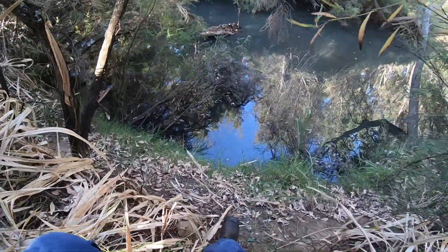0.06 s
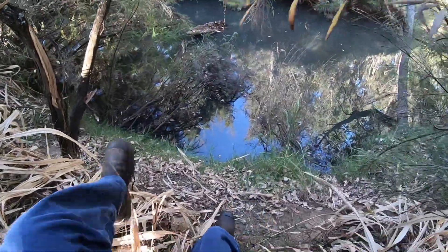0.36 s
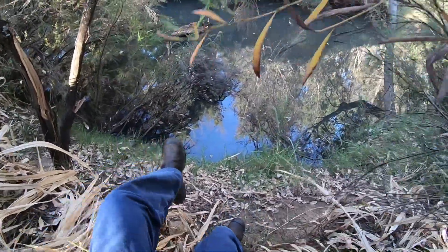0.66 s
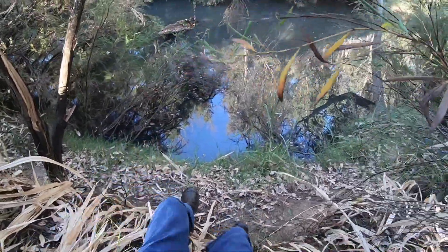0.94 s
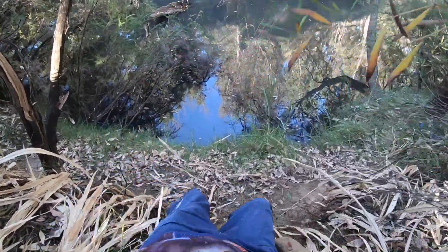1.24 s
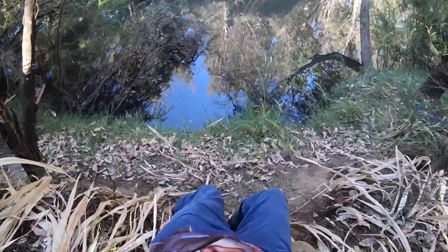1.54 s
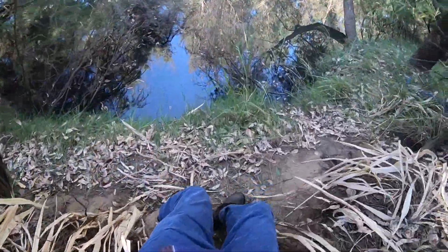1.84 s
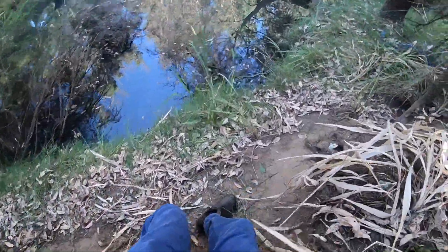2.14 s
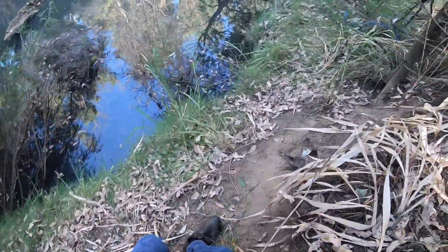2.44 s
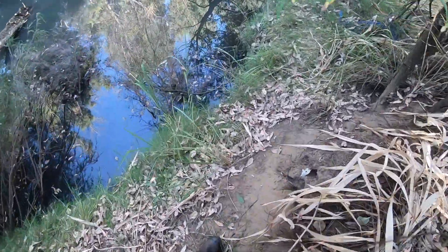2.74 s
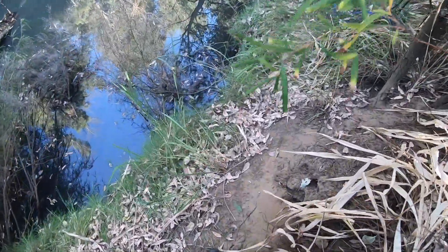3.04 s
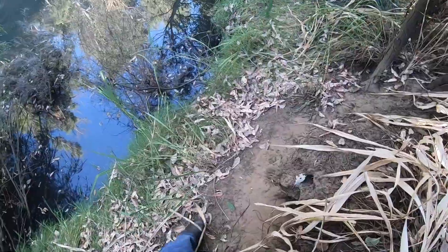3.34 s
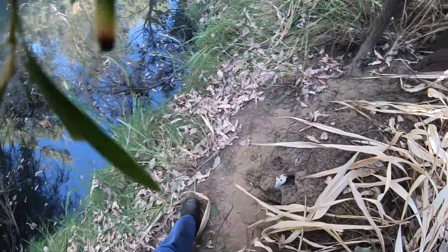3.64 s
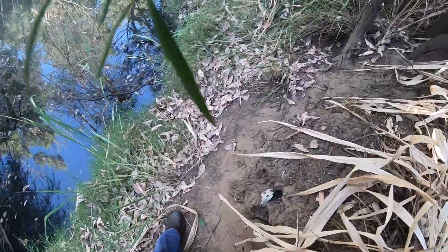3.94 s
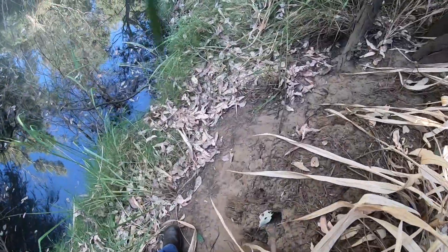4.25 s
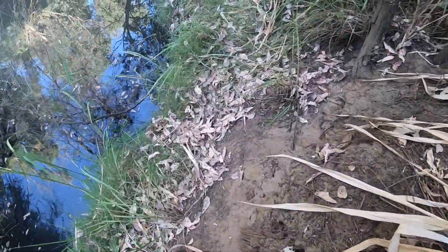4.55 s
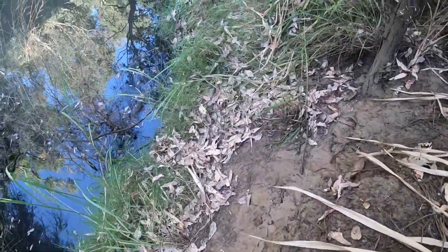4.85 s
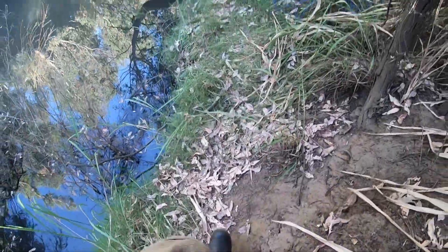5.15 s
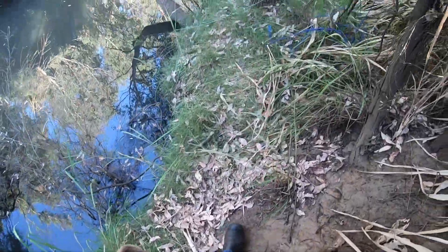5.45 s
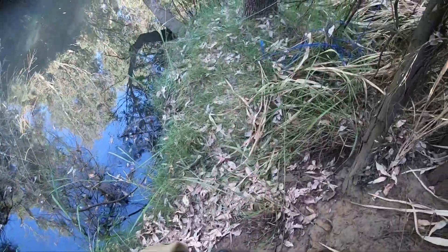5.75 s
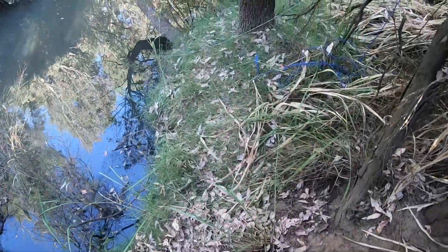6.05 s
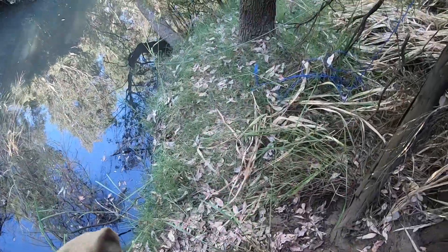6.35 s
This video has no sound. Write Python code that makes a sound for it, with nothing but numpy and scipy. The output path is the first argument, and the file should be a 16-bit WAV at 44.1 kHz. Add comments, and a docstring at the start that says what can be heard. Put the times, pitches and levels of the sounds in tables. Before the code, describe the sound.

Someone steps slowly through dry reeds and leaves on a riverbank, heard from a chest-worn microphone that rumbles and bumps with each move. Papery rustles swell and fade among sharp little snaps. Just past halfway, a stalk clacks loudly and scrapes on the microphone. Clothing then rubs and thumps against it during the heaviest crunching, before lighter rustling and snaps continue over a faint steady hiss.

```python
"""A riverbank of dry reeds and leaves, crossed in slow steps and heard from a camera worn on the chest.
Each sweep of a leg swells and fades in the blades, which rustle by friction and snap underfoot.
A stalk strikes the camera and scrapes past its left port; then the chest leans in and clothing rubs
on the mount. The mount rumbles with every move, and the cavity resonance of the two microphone ports
colours the reeds, the stalk and a steady hush near 2 kHz."""
import sys
import numpy as np
from scipy import signal
from scipy.fft import rfft, irfft, next_fast_len
from scipy.io import wavfile
from scipy.ndimage import uniform_filter1d, map_coordinates

SR = 44100
rng = np.random.default_rng(int(sys.argv[2]) if len(sys.argv) > 2 else 0)


def to_wav(s):
    """Save 16-bit WAV."""
    ch = np.atleast_2d(s).T  # columns
    pcm = np.round(np.clip(ch, -1, 1) * 32767)  # PCM
    wavfile.write(sys.argv[1], SR, pcm.astype(np.int16))


N = 282314
TIME = np.arange(N) / SR
SWELL_DB = 18.5  # a movement sinks this far over its rise or fall time

# sway of the body on the mount: t/s, level/dB
SWAY = [(0.0, -37.5), (0.03, -21), (0.46, -23), (0.77, -15), (0.86, -20), (0.91, -10), (0.96, -32),
        (1.05, -12.5), (1.3, -18), (1.67, -18.5), (2.07, -16), (2.12, -24.5), (2.28, -14.5), (2.32, -26),
        (3.21, -26), (3.26, -41.5), (3.51, -19.5), (3.67, -13), (3.78, -30.5), (3.94, -18), (4.01, -35.5),
        (4.19, -10.5), (4.44, -8), (4.45, -15), (4.62, -18), (4.66, -13.5), (4.87, -26.5), (5.04, -30.5),
        (5.24, -13.5), (5.33, -41), (5.4, -12.5), (5.83, -32.5), (6.01, -16), (6.1, -25.5), (6.4, -34)]
# the chest leaning into the case: t/s at the height, rub level/dB, thump level/dB, rise/s, fall/s
LEANS = [(.2, -55, -45, 0.13, .2), (1.44, -54, -62, 0.059, 0.063), (1.99, -49, -46, 0.35, 0.35),
         (2.34, -53.5, -41.5, 0.084, 0.21), (2.55, -40.5, -60, 0.099, 0.089), (3.47, -55, -39, 0.13, 0.39),
         (3.61, -35, -19, 0.13, 0.14), (3.93, -47.5, -33.5, 0.29, 0.37), (4.178, -33.5, -46, 0.035, 0.13),
         (4.29, -22.5, -13.5, 0.058, 0.16), (4.39, -33.5, -34, 0.085, 0.18), (4.611, -32, -17, 0.11, .13)]
# spectrum of fabric slipping on the mount: f/Hz, level/dB
CLOTH_SPECTRUM = [(50, -31.5), (100, 6), (150, 0.5), (190, 3), (290, -2), (350, -5), (430, -7.5),
                  (520, -18), (740, -17.5), (1100, -16.5), (2000, -11.5), (5000, -92)]
# spectrum of the weave rasping on the case: f/Hz, level/dB
GRIT_SPECTRUM = [(250, -25), (500, -4), (720, 10.5), (950, -7.5), (1500, -19.5), (4000, -49)]


def amp(db):
    """Amplitude ratio of a level in decibels."""
    return 10 ** (np.asarray(db) / 20)


def unit(x):
    """Normalisation to an rms of 1."""
    return x / np.sqrt(np.mean(x ** 2) + 1e-20)


def unit_peak(x):
    """Normalisation to a peak of 1."""
    return x / np.abs(x).max()


def along(points, hz):
    """Interpolation of (f/Hz, value) points on a logarithmic frequency axis."""
    f, values = np.transpose(points)
    return np.interp(np.log(hz + 1), np.log(f + 1), values)


def curves(rows):
    """Linear interpolation in time: one value per sample for each column after t/s."""
    times, *columns = np.transpose(rows)
    return [np.interp(TIME, times, column) for column in columns]


def wobble(rate):
    """Smooth random modulation: a spline through `rate` Gaussian knots a second."""
    return map_coordinates(rng.standard_normal(int(N * rate / SR) + 4), [TIME * rate])


def coloured(x, gain_db):
    """Minimum-phase filtering by a gain in dB that is a function of frequency."""
    n = x.shape[-1]
    size = 2 * next_fast_len(n // 2 + 4096, True)
    cepstrum = irfft(np.log(amp(gain_db(np.fft.rfftfreq(size, 1 / SR)))), size)
    cepstrum[1:size // 2] *= 2  # folding the cepstrum makes the filter causal
    cepstrum[size // 2 + 1:] = 0
    return irfft(rfft(x, size) * np.exp(rfft(cepstrum)), size)[..., :n]


def shaped(x, spectrum):
    """Filtering by a response given as (f/Hz, level/dB) points."""
    return coloured(x, lambda hz: along(spectrum, hz))


def treble(hz, edge_hz):
    """Shelf transition from 0 in the bass to 1 in the treble."""
    return 1 - 1 / (1 + (hz / edge_hz) ** 6)


def resonant_noise(hz, width, size):
    """Random excitation of one damped resonance; its half-width is a fraction of its frequency."""
    f = np.fft.rfftfreq(size, 1 / SR)
    return unit(irfft(rfft(rng.standard_normal(size)) / (1 + ((f - hz) / (width * hz)) ** 2), size))


def crackle(per_second, spread_db):
    """Shot noise: tiny fractures at random times, most of them weak and a few strong."""
    sizes = amp(spread_db * np.minimum(rng.standard_normal(N), 2)) * rng.choice([-1, 1], N)
    return unit(sizes * (rng.random(N) < per_second / SR))


def crackle_pair(per_second, spread_db, apart_db):
    """Partial coherence: some fractures reach both ports, others, at apart_db, only one."""
    separate = np.array([crackle(per_second, spread_db) for side in range(2)])
    return crackle(per_second, spread_db) + amp(apart_db) * separate


def swell(s, db, rise, fall):
    """Nearly exponential growth and decay of one movement, greatest at time s."""
    gain = np.zeros(N)
    near = slice(*np.searchsorted(TIME, [s - 2 * rise, s + 2 * fall]))
    away = np.maximum((s - TIME[near]) / rise, (TIME[near] - s) / fall)
    gain[near] = amp(db - SWELL_DB * away ** 0.98)
    return gain


def power_sum(gains):
    """Incoherent sounds add in power."""
    return np.sqrt(sum(gain ** 2 for gain in gains))


def add(track, s, sound):
    """Superposition of a short sound on the track from time s."""
    part = track[:, max(round(s * SR), 0):][:, :sound.shape[-1]]
    part += sound[..., :part.shape[-1]]


def panned(x, right_db):
    """Level difference between the ports: the right gains right_db and the left loses as much."""
    return x * amp([[-right_db], [right_db]])


def ports(pair, left_lag_ms):
    """Cavity resonance colours the sound in each port; unequal paths make one side lag."""
    # responses of the two port cavities: f/Hz, level/dB
    left_response = [(200, -23), (520, -21.5), (720, -15.5), (1150, -8), (1450, -5.5), (2000, 5.5),
                     (2500, -8), (2850, 1), (3900, -18), (4800, -19), (7000, -11.5), (7800, -12),
                     (11000, -31.5), (15000, -50)]
    right_response = [(200, -25.5), (570, -21), (950, -11), (1220, -7), (1650, 6.5), (2050, 6.5),
                      (2600, -5), (3300, -3.5), (3900, -16), (5900, -10.5), (8100, -21), (9600, -20.5),
                      (11000, -35), (15000, -41)]
    half_lag = round(left_lag_ms * SR / 2000)
    left = np.roll(shaped(pair[0], left_response), half_lag)
    right = np.roll(shaped(pair[1], right_response), -half_lag)
    return np.array([left, right])


def hiss(level_db=-48.5):
    """Stationary noise of the bank and the microphones, resonating in the ports and partly coherent."""
    # spectrum of the hush: f/Hz, level/dB
    hush_spectrum = [(100, 5), (300, -12), (450, -13), (880, -20), (1080, -3), (1350, -10.5), (1700, 2.5),
                     (2020, -2), (2400, -9.5), (4100, -13), (6000, -9.5), (7900, -3), (9200, -13),
                     (11000, -80)]
    # likeness of left and right: f/Hz, correlation coefficient
    coherence = [(100, 0.15), (300, -0.38), (600, -0.3), (1100, -0.095), (1500, 1), (2100, 0.95), (3000, 1),
                 (4800, -0.83), (7000, -0.29), (9000, 0.082)]
    likeness = lambda hz: np.clip(along(coherence, hz), -0.95, 0.95)
    mid, side = shaped(rng.standard_normal((2, N)), hush_spectrum)
    mid = coloured(mid, lambda hz: 10 * np.log10(1 + likeness(hz)))
    side = coloured(side, lambda hz: 10 * np.log10(1 - likeness(hz)))
    return amp(level_db) * unit(np.array([mid + side, mid - side]))


def rumble(mount_hz=41, cutoff_hz=53, flutter_db=5, loose_db=-8):
    """Forced vibration: the body's sway rocks the camera in uneven bouts and shifts it on its mount."""
    # spectrum of the loose shifting: f/Hz, level/dB
    loose_spectrum = [(10, -19.5), (22, 6), (33, -6), (43, -1), (54, -9.5), (66, -10), (80, -24), (95, -29),
                      (125, -30.5), (165, -61), (230, -53), (500, -100)]
    sway = amp(curves(SWAY)[0])
    wandering_hz = mount_hz * np.exp(0.3 * wobble(40))
    bouts = amp(-flutter_db * np.abs(wobble(22)) ** 1.07)
    rocking = np.sin(2 * np.pi * np.cumsum(wandering_hz) / SR) * bouts
    lowpass = signal.butter(4, cutoff_hz, fs=SR, output="sos")
    rocking = signal.sosfiltfilt(lowpass, sway * unit(rocking))
    noise = rng.standard_normal(N) + 0.19 * rng.standard_normal((2, N))
    shifting = amp(loose_db) * uniform_filter1d(sway, size=6000) * unit(shaped(noise, loose_spectrum))
    return panned(rocking + shifting, right_db=2)


def shove(level_db=-1):
    """Structure-borne sound: pressure of the chest on the case thumps both ports alike."""
    # spectrum of the case under pressure: f/Hz, level/dB
    thump_spectrum = [(30, -10), (58, 8), (78, 1.5), (92, -2), (125, -15.5), (170, -22), (400, -65.5)]
    pressure = power_sum(swell(s, db, rise, fall) for s, _, db, rise, fall in LEANS)
    return amp(level_db) * pressure * unit(shaped(rng.standard_normal(N), thump_spectrum))


def bumps(mount_hz=38, attack_s=0.008, ring_t60=0.18, rub_t60=0.042, grit_db=-12):
    """Damped free vibration: a jolt swings the mount for a few cycles and drags the fabric."""
    # bumps of the mount against the chest: t/s, thud level/dB, rub level/dB
    jolts = [(.25, -41, -43), (.595, -9, -54), (.66, -12, -59), (.738, -9.5, -52), (.875, -12, -58),
             (1.105, -19, -57), (1.213, -8.5, -57), (1.315, -9, -59), (1.515, -18, -60), (1.60, -19, -57),
             (1.765, -15, -60), (1.83, -12, -60), (1.97, -12.5, -60), (2.009, -16, -22), (2.533, -14, -53),
             (4.276, -12, -29), (4.381, -12, -17), (4.411, -6.5, -46), (4.645, -2.5, -40),
             (4.804, -25, -32.5), (5.386, -9, -66), (5.44, -13, -62), (5.99, -14, -56)]
    out, t = np.zeros((2, N)), np.arange(SR // 3) / SR
    onset = 1 - np.exp(-(t / attack_s) ** 2)
    thud = np.sin(2 * np.pi * mount_hz * t) * amp(-60 * t / ring_t60) * onset
    for s, thud_db, rub_db in jolts:
        drag = rng.standard_normal((2, len(t))) * amp(-60 * t / rub_t60)
        rub = unit_peak(shaped(drag[0], CLOTH_SPECTRUM))
        grit = unit_peak(shaped(drag, GRIT_SPECTRUM))
        add(out, s, amp(thud_db) * thud + amp(rub_db) * (rub + amp(grit_db) * grit))
    return panned(out, right_db=1.5)


def cloth(level_db=-1, sway_db=-50, catch_db=2.5, grit_db=-15):
    """Stick-slip friction of fabric on the mount: faint with the sway, gritty at each lean."""
    slips = unit(shaped(crackle_pair(per_second=900, spread_db=6.5, apart_db=-8.5), CLOTH_SPECTRUM))
    grit = unit(shaped(crackle_pair(per_second=700, spread_db=4, apart_db=9.5), GRIT_SPECTRUM))
    leaning = power_sum(swell(s, db, rise, fall) for s, db, _, rise, fall in LEANS)
    swaying = amp(curves(SWAY)[0] + sway_db + catch_db * wobble(19))
    return amp(level_db) * (slips * power_sum([leaning, swaying]) + amp(grit_db) * grit * leaning)


def creaks(level_db=-4):
    """Friction-excited resonance: the strap slips in a short swell around one pitch."""
    # dull creaks of the harness: t/s, level/dB, f/Hz, duration/s
    strap_slips = [(2.01, -51, 330, 0.018), (2.543, -38.5, 410, 0.055), (2.707, -46.5, 413, 0.17),
                   (3.366, -37, 241, 0.043), (3.416, -44, 300, 0.042), (3.917, -43.5, 300, 0.094),
                   (4.21, -28.5, 277, 0.13), (4.276, -21, 277, 0.05), (4.377, -19, 277, 0.057)]
    out, t = np.zeros((2, N)), np.arange(SR // 2) / SR - 0.25
    for s, db, hz, duration in strap_slips:
        groan = resonant_noise(hz, width=0.12, size=len(t)) * np.exp(-(2 * t / duration) ** 2)
        add(out, s + t[0], amp(db + level_db) * unit_peak(groan))
    return out


def wading(stir_depth_db=2.2, stir_rate=22):
    """Power addition of leg sweeps and uneven stirring gives the rustle's body and crisp levels in dB."""
    # a leg sweeping through blades: t/s at the height, body level/dB, crisp level/dB, rise/s, fall/s
    sweeps = [(.155, -30, -41.5, 0.14, 0.15), (1.66, -43, -55.5, 0.3, 0.72),
              (1.997, -34, -46.5, 0.074, 0.072), (2.2, -45.5, -58.5, 1, 0.55),
              (2.55, -36, -63, 0.048, 0.082), (3.05, -49, -53.5, 0.56, 0.18),
              (3.85, -46.5, -52.5, 0.52, 0.45), (4.18, -38, -46, 0.26, 0.1), (4.295, -27, -40, 0.12, 0.14),
              (4.545, -27.5, -36.5, 0.25, 0.2), (4.85, -44, -49, 0.73, 0.8), (5.435, -43, -46.5, 0.19, 0.2),
              (5.8, -41, -48, 0.087, 0.044)]
    # blades stirring between the sweeps: t/s, body level/dB, crisp level/dB
    stirring = [(0, -51, -55.5), (.55, -51, -59.5), (1.1, -48, -57), (2.1, -59, -58.5), (2.6, -53.5, -71),
                (3.3, -46.5, -53.5), (5.2, -55.5, -52), (6, -50.5, -61.5), (6.4, -54, -83)]
    stir_body, stir_crisp = amp(np.array(curves(stirring)) + stir_depth_db * wobble(stir_rate))
    body = [swell(s, db, rise, fall) for s, db, _, rise, fall in sweeps] + [stir_body]
    crisp = [swell(s, db, rise, fall) for s, _, db, rise, fall in sweeps] + [stir_crisp]
    return 20 * np.log10([power_sum(body), power_sum(crisp)])


def rustle(body_db=-1, ticks_db=-6, husk_db=-47, air_db=4, flicker_db=1.5):
    """Sliding friction of dry blades: a papery body, sharper crackle above it and stray ticks."""
    # spectrum of crushed hollow stems: f/Hz, level/dB
    husk_spectrum = [(200, -39), (550, -11), (800, -7), (1050, -1.5), (1400, -5), (3000, -70)]
    body_level, crisp_level = wading()
    body = ports(crackle_pair(per_second=2200, spread_db=2.5, apart_db=-10.5), left_lag_ms=0.51)
    body = coloured(body, lambda hz: -35 * treble(hz, 4580))
    crisp = ports(crackle_pair(per_second=1600, spread_db=3, apart_db=1), left_lag_ms=0.5)
    crisp = coloured(crisp, lambda hz: 35 * (treble(hz, 2640) - 1) + air_db * treble(hz, 11000))
    ticks = ports(crackle_pair(per_second=70, spread_db=4, apart_db=-8), left_lag_ms=0.5)
    blades = amp(body_level + body_db + flicker_db * wobble(45)) * unit(body)
    blades += amp(crisp_level + flicker_db * wobble(45)) * unit(crisp)
    blades += amp(np.minimum(body_level, -42) + ticks_db) * unit(ticks)
    # only a hard push crushes the thick stems, which sound hollow and lower
    push = amp(1.45 * (body_level + 31.5) + husk_db)
    husks = unit(shaped(crackle_pair(per_second=1500, spread_db=2, apart_db=9), husk_spectrum))
    return blades + panned(push * husks, right_db=3.5)


def snaps(splinter_db=-4, lift_hz=3060, tilt_hz=5030):
    """Brittle fracture: one crack and a quickly dying run of splinters; thin blades break brighter."""
    # blades and twigs breaking: t/s, level/dB, treble lift/dB, top tilt/(dB per octave), splinter t60/s
    fractures = [(0.383, -14.5, 9.0, 7, 0.012), (0.765, -6, -1, 7, 0.023), (0.806, -8, -4.5, -3.5, 0.02),
                 (0.989, -15.5, 12.5, 2, 0.025), (1.2031, -6, 11.5, -0.5, 0.028),
                 (1.4371, -6.5, 11.5, 9.0, 0.012), (1.5285, -5.5, -16, 0.0, 0.019),
                 (1.646, -2.5, 0.0, -4, 0.034), (1.683, -7.5, -9.0, -1, 0.03),
                 (1.832, -15, 17.0, -6, 0.025), (1.9192, -2, 11, -0.5, 0.016), (1.973, 4.0, -16, 4, 0.035),
                 (1.991, 2.5, -15, 5, 0.032), (2.002, 1, -9.0, 0, 0.035), (2.0788, 1.5, -5, -2.0, 0.023),
                 (2.3205, -7, -3, 3.0, 0.016), (2.823, -5.5, 2, 4, 0.027), (2.977, -6.5, 4.5, -5.0, 0.023),
                 (3.045, -4.5, -1.0, -9, 0.02), (3.203, -4, 0.0, -7, 0.02), (3.298, 0.5, -5.0, -3.0, 0.029),
                 (3.7838, 5.5, -8, 5, 0.035), (3.799, -5, -4, 3, 0.032), (4.181, 4.5, -14, 3, 0.045),
                 (4.207, -5, 3, 4, 0.027), (4.294, 6.5, -0.5, -3, 0.029), (4.3157, 7, 13.5, -6.5, 0.022),
                 (4.363, 6, -14.0, 0, 0.04), (4.382, 7, -15, 3.5, 0.018), (4.395, 0, 7, -1, 0.02),
                 (4.417, -6.0, 3, 15, 0.0142), (4.492, 4.5, 1, 3, 0.028), (4.541, -1, -11.0, 2, 0.03),
                 (4.563, 0, -2, 2, 0.03), (4.79, -0.5, 7, -8.5, 0.039), (5.154, -17, 20, 3, 0.015),
                 (5.406, 0.5, 1, 0.0, 0.025), (5.445, 2, 6, -3, 0.025), (5.484, -8, 14, -8, 0.02),
                 (5.654, -12.5, 20, -9, 0.015), (5.7911, -8, 7.5, -5, 0.02), (5.804, -0.5, 0.0, -4, 0.023)]
    out, t = np.zeros((2, N)), np.arange(SR // 10) / SR
    for s, db, lift_db, tilt_db, t60 in fractures:
        fibres = rng.standard_normal(len(t)) + 0.36 * rng.standard_normal((2, len(t)))
        burst = (t == 0) + amp(splinter_db - 60 * t / t60) * fibres
        burst /= np.linalg.norm(burst, axis=1, keepdims=True)
        snap = ports(np.pad(burst, ((0, 0), (32, 0))), left_lag_ms=0.5)  # padding leaves room for the lag
        colour = lambda hz: lift_db * treble(hz, lift_hz) + tilt_db * np.log2(np.maximum(hz / tilt_hz, 1))
        add(out, s, amp(db) * coloured(snap, colour))
    return out


def stalk_grip(touch_s=3.527, attack_s=0.023, bite_s=3.605, rise_s=0.086, hold_s=0.063, fall_s=0.058):
    """Contact force sets the scrape's gain: the stalk bites in, holds and slips off faster, juddering."""
    away = np.maximum((bite_s - TIME) / rise_s, (TIME - bite_s - hold_s) / fall_s)
    judder_db = 2 * wobble(260)
    contact = np.clip((TIME - touch_s) / attack_s, 0, 1)
    return contact * amp(-29.5 - SWELL_DB * np.maximum(away, 0) + judder_db)


def stalk(ring_db=-10, drift_rad=0.089, crack_lift_db=3):
    """Impact and friction excite the case: a stalk clacks and scrapes on it, nearer the left port."""
    # response of the case: f/Hz, level/dB
    case_response = [(300, -0.5), (800, -12.5), (1050, 2), (1350, 7.5), (1700, -9), (2300, -2.5),
                     (2900, 1.5), (3500, -1.5), (4300, 9.5), (6000, -3.5), (7200, 0), (14000, -1)]
    # the stalk chattering on the case: t/s, level/dB, ring f/Hz, t60/s, crack level over the ring/dB
    strikes = [(3.5265, -18, 1720, 0.034, 0.5), (3.541, -19, 6900, 0.03, 2), (3.547, -16.5, 5330, .018, -1),
               (3.553, -16, 1840, 0.054, -9), (3.5657, -13, 1750, 0.035, -6), (3.570, -16, 1720, .04, -14),
               (3.5865, 4, 1660, 0.0032, 0), (3.5928, -23, 1450, .035, -9), (3.599, -15, 7000, .014, 2),
               (3.6056, -12, 1370, 0.019, -2), (3.6103, -17, 7600, .025, 0),
               (3.6233, -4.5, 2120, 0.013, -6), (3.6243, -8, 2630, .012, -9), (3.630, -17, 1870, .03, -6),
               (3.657, -12, 7300, 0.028, 0), (3.6616, -6, 7740, .018, -4), (3.664, -11, 1400, 0.042, -6),
               (3.6813, -12, 4000, 0.032, -1), (3.693, -16, 1500, .04, -14), (3.7055, -23, 3900, .035, -4),
               (3.7145, -23, 2900, .035, 0), (3.7285, -20, 1810, .04, -2)]
    through_case = lambda pair: shaped(ports(pair, left_lag_ms=-0.6), case_response)
    scrape = through_case(crackle_pair(per_second=3200, spread_db=3.5, apart_db=4))
    out, t = unit(scrape) * stalk_grip(), np.arange(SR // 10) / SR
    for s, db, hz, t60, crack_db in strikes:
        wander = np.cumsum(drift_rad * rng.standard_normal(len(t)))  # chatter roughens the ring
        crack = coloured(rng.standard_normal((2, len(t))), lambda f: crack_lift_db * treble(f, 3900))
        ring = np.sin(2 * np.pi * hz * t + wander) + amp(crack_db) * crack
        blow = 2 * (t == 0) + ring * amp(ring_db - 60 * t / t60)
        clack = through_case(np.pad(blow, ((0, 0), (24, 0))))
        add(out, s, amp(db) * unit_peak(clack))
    return panned(out, right_db=-1.5)


def knock(s=3.5865, level_db=-7, attack_s=0.00015):
    """Modal ringing: the stalk's hardest blow sounds the shell, each mode with its own stereo balance."""
    # modes of the camera shell: f/Hz, level/dB, t60/s, left over right/dB
    shell_modes = [(566, -23, .007, 17), (1185, -7.5, 0.01, -6), (1380, -4.5, 0.0032, 0),
                   (1945, 8, 0.0095, 15)]
    out, t = np.zeros((2, N)), np.arange(SR // 20) / SR
    onset = 1 - np.exp(-t / attack_s)
    for hz, db, t60, left_db in shell_modes:
        ring = np.sin(2 * np.pi * hz * t) * onset * amp(level_db + db - 60 * t / t60)
        add(out, s, panned(ring, right_db=-left_db / 2))
    return out


def scene():
    """Linear superposition of the mount's noises, the reeds, the stalk and the hush."""
    mount = rumble() + shove() + cloth() + bumps() + creaks()
    return mount + rustle() + snaps() + stalk() + knock() + hiss()


def record(dry, top_hz=15300):
    """Hard clipping and band limiting: the heavy bass thuds near 4.4 s, and the loudest clack, overload the
    input; the top is cut off."""
    size = next_fast_len(N + 4096)
    passband = np.fft.rfftfreq(size, 1 / SR) < top_hz
    return irfft(rfft(np.clip(dry, -1, 1), size) * passband, size)[:, :N]


dry = scene()
out = record(dry)
to_wav(out)
```